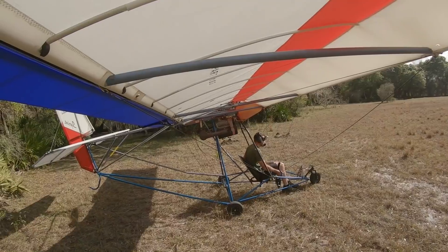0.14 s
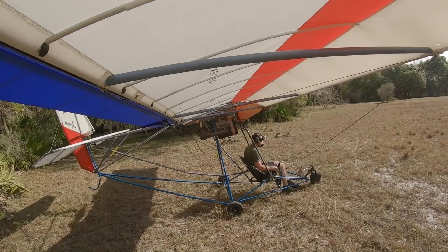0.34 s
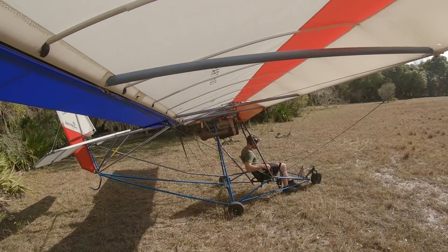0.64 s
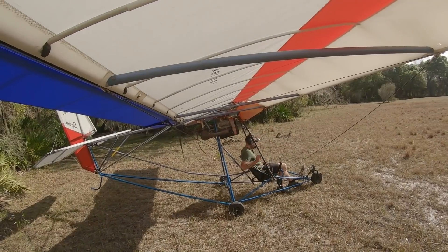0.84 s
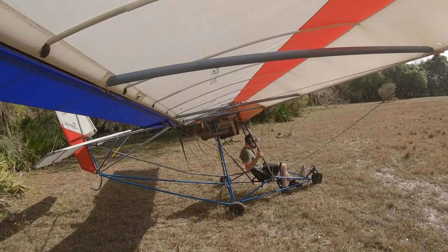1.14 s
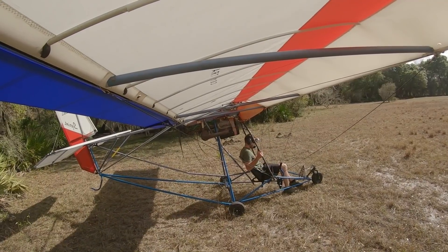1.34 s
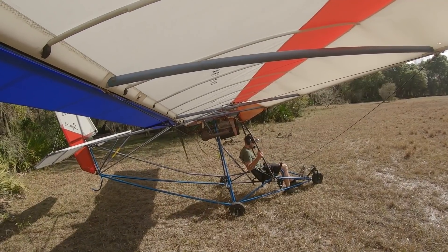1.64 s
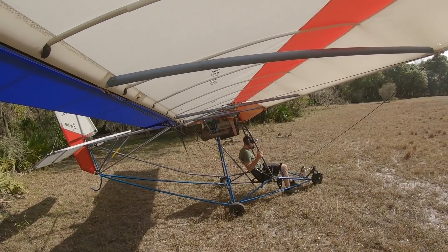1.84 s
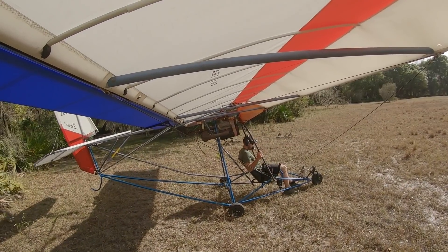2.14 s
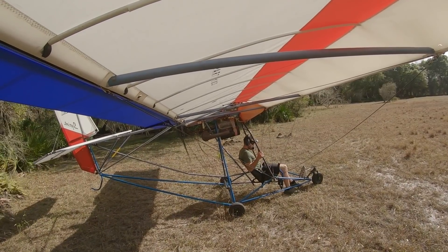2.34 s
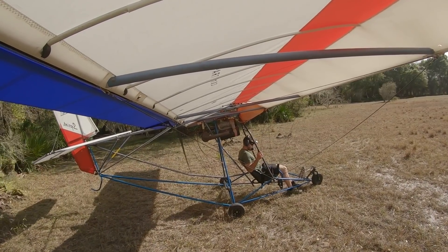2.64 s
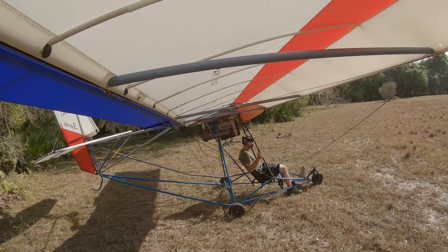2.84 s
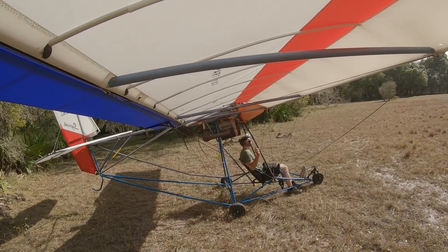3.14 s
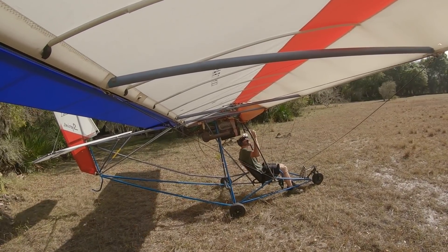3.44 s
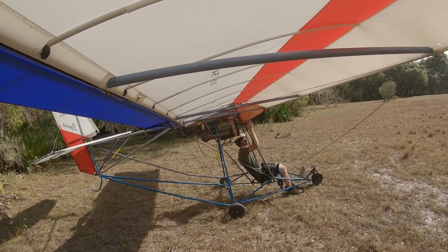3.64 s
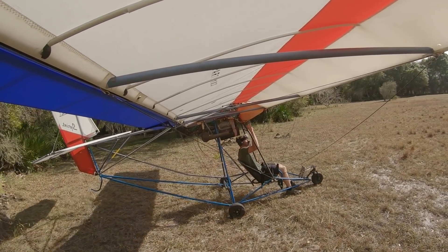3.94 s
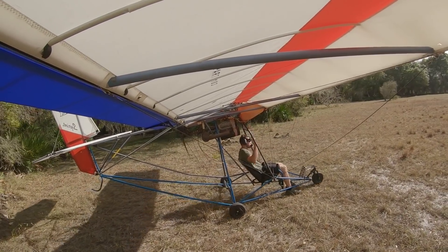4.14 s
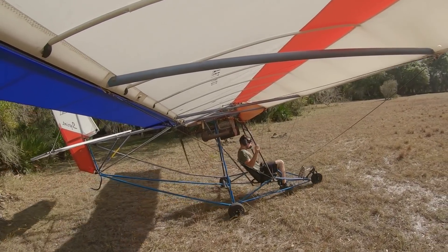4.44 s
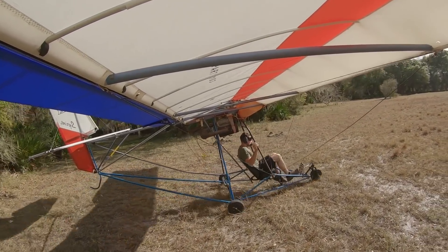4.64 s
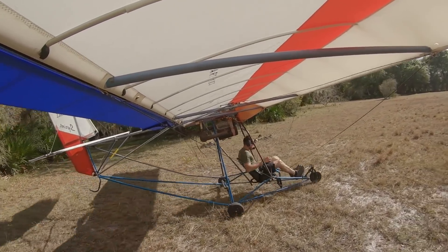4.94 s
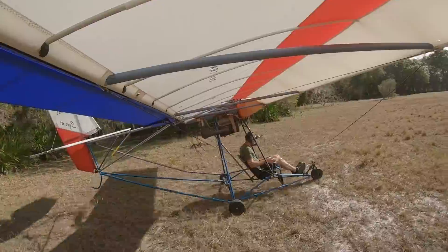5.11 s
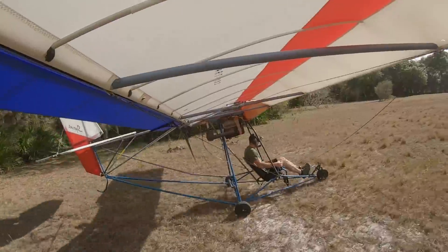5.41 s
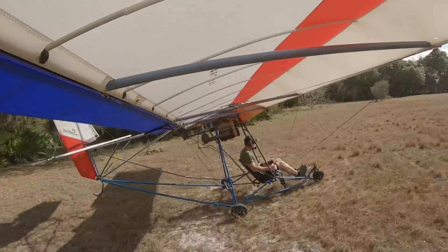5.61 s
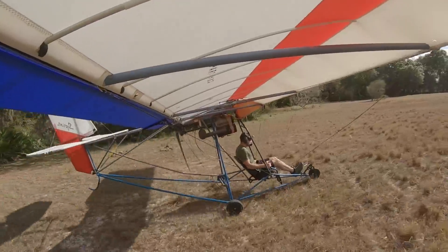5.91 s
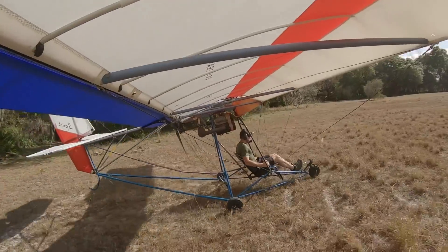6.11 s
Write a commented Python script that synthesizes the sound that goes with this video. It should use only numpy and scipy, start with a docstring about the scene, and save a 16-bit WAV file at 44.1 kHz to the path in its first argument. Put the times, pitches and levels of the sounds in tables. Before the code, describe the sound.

An ultralight in an open grass field, captured from beneath its wing. Quiet moving air gives way to a rough rattling idle, then a rapid climb in pitch to a nasal drone and piercing fan whine. A second, stronger surge brings a thick exhaust boom and fast propeller chop, which holds steady to the end. Close, muffled, nearly centred pickup, with little echo, thin hiss and tiny ticks.

```python
"""Ultralight taking off, heard from under the wing

After a soft rush of air, a twin two-stroke engine idles with knocks and sputters, made from ringing tones.
It runs up: filtered clicks and noise give the rasp, overtones the drone, and a sine the whine of the fan.
At full throttle for the takeoff run, the exhaust booms at the firing rate. The belt-driven pusher propeller
chops the air with a repeated pulse, beating against the engine. Rumble, hiss and faint ticks surround it.
"""
import sys
import numpy as np
from scipy import signal
from scipy.fft import rfft, irfft, next_fast_len
from scipy.io import wavfile
from scipy.ndimage import uniform_filter1d, map_coordinates

SR = 44100
rng = np.random.default_rng(int(sys.argv[2]) if len(sys.argv) > 2 else 0)


def unload_wav(signal):
    """Save mono or channel-first audio to the path in sys.argv[1] as 16-bit WAV at rate SR, clipped to [-1, 1]."""
    wavfile.write(
        sys.argv[1],
        SR,
        np.round(np.clip(np.atleast_2d(signal).T, -1, 1) * 32767).astype(np.int16),
    )


N = 276507

# Speed and belts. Crankshaft speed: (time [s], speed [turns/s])
CRANK_SPEED = [(1.4, 41.1), (1.49, 42.1), (1.7, 51.1), (1.79, 55.1), (1.93, 60.1), (2.1, 65.3),
               (2.27, 69.3), (2.36, 71.1), (2.62, 74.9), (3.01, 78.3), (3.37, 80.1), (4.18, 82.55),
               (4.26, 84.8), (4.52, 99.3), (4.67, 103.7), (4.95, 106.7), (5.47, 107.8), (6.27, 108.1)]
# The propeller belt slips more under load: (crank speed [turns/s], blade passes [per crank turn])
PROPELLER_BELT = [(41, .756), (66, .741), (80.5, .742), (85, .732), (102, .728)]
# The cooling fan's belt also slips: (crank speed [turns/s], vane passes [per crank turn])
FAN_BELT = [(41, 18.05), (58, 17.98), (66, 17.8), (76, 17.78), (79.2, 17.85), (80.5, 17.86), (82.3, 17.78),
            (100, 17.8)]

# Throttle. The idling engine comes in abruptly.
IDLE_S, IDLE_ATTACK_S = 0.664, 0.018
# The first push is louder at once, before the speed follows: (start [s], attack [s], hold [s], release [s])
FIRST_PUSH, FIRST_PUSH_DB = (1.41, 0.17, 0.084, 0.71), 2.5
# Just below full throttle the fan sings out and many layers change level with it:
# (start [s], attack [s], hold [s], release [s])
SINGING = (2.747, 0.18, 1.061, 0.12)
# The throttle opens fully; the noise surges and settles as the aircraft gets rolling.
THROTTLE_S, OPENING_S = 4.213, 0.42
SURGE_S, SURGE_RISE_S = 4.306, 0.32

# Background air. Colours of the rumble, the opening rush and the hiss: (frequency [Hz], gain [dB])
RUMBLE_COLOUR = [(10, -16), (28, -5), (60, -1), (120, -0.5), (200, -18), (600, -70), (2000, -120)]
RUSH_COLOUR = [(100, -8), (180, 3.5), (300, 3), (600, -2), (1150, -0.5), (2000, -7), (3200, -10.5),
               (4200, -73)]
HISS_COLOUR = [(2500, -19), (4500, -16), (8000, -1.5), (12000, -2.5), (13000, 4.5), (14000, -12),
               (14900, 14), (15300, 3.5)]
RUMBLE_DB, RUMBLE_DB_PER_DOUBLING = -62, 6.5
RUSH_DB, RUSH_FADE_S = -51.5, 0.85

# Faint ticks as the takeoff run begins: (time [s], level [dB], centre [Hz])
TICKS = [(4.712, -55, 8950), (4.788, -42.5, 4070), (4.813, -59, 7900), (4.921, -60, 8800),
         (4.949, -46.5, 4400), (5.027, -58, 8060), (5.103, -47, 4080), (5.149, -60.5, 8230),
         (5.174, -55.5, 5950), (5.181, -54.5, 4540)]
TICK_T60_S, TICK_RING_DB, TICK_RING_T60_S = 0.012, -16, 0.1
# A low thud comes with each tick; its level is relative to the tick.
THUD_DB, THUD_HZ, THUD_T60_S = 9.5, 44.8, 0.067

# Loose fittings knock at idle: (time [s], pitch [Hz], level [dB])
CLANKS = [(0.679, 1126, -37), (0.712, 2120, -42), (0.732, 1420, -37.5), (0.749, 2090, -37),
          (0.803, 705, -39), (0.858, 1208, -42.5), (0.918, 1010, -37), (0.931, 805, -36.5),
          (0.99, 930, -32.5), (1.006, 2290, -37), (1.142, 2000, -35), (1.168, 1230, -32),
          (1.268, 1400, -40.5)]
CLANK_ATTACK_S, CLANK_T60_S = 0.004, 0.08
# Sputters at idle: (time [s], low mode [dB], middle mode [dB], high mode [dB])
SPUTTERS = [(0.732, -54, -50.5, -52.5), (0.914, -53.5, -33.5, -53), (0.942, -60.5, -33.5, -51),
            (0.985, -60, -31.5, -54), (0.996, -44, -32, -32.5), (1.046, -34, -37, -34),
            (1.07, -58, -54, -39.5), (1.305, -41.5, -40.5, -53.5)]
# Silencer modes that a sputter rings: (pitch [Hz], time to fall 60 dB [s])
SILENCER_MODES = [(500, .1), (1100, 0.081), (1720, 0.13)]
SPUTTER_ATTACK_S = 0.0056

# Loose parts shaken by uneven firing: (frequency [Hz], width before squaring [Hz], gain [dB])
LOOSE_PARTS = [(248, 130, -4.5), (507, 110, -11), (716, 160, -11.5), (1210, 240, -2.5), (1810, 220, -2.5)]
RATTLE_DB, RATTLE_SCATTER_DB = -50, 5.5
# The silencer burbles at one low resonance: (frequency [Hz], width before squaring [Hz], gain [dB])
BURBLE_MODES = [(175, 49, 0)]
BURBLE_START_S, BURBLE_RISE_S = 0.84, 0.1
BURBLE_IDLE_DB, BURBLE_DB_PER_DOUBLING = -52, -6

# Drone on crank orders 4, 5, 6 and blade order 7:
# (idle level [dB], rise per speed doubling [dB], singing change [dB], full throttle change [dB])
HUM_LEVELS = [(-51, 6.5, 12, -20), (-76, 25, 15, -15.5), (-59.5, 22.5, -8.5, -8), (-69.5, 32, 4, -29.5)]
HUM_START_S, HUM_ATTACK_S = 1.44, 0.1
# How the silencer colours the 4th order as it sweeps: (frequency [Hz], gain [dB])
SILENCER_COLOUR = [(165, -2.5), (188, -1.5), (250, 3.5), (280, -2), (320, -1.5), (400, 1)]

# Mount and fan sound out while the engine pulls up to a new speed:
# (start [s], attack [s], hold [s], release [s], buzz [dB], buzz tilt [dB/octave], fan [dB])
PULLS = [(1.47, 0.17, 0.58, 0.34, -31, 3.5, -35), (4.191, 0.13, 0.31, 0.15, -25, -5, -27.5),
         (4.399, 0.17, 0.42, 0.14, -31.5, 28.5, -36)]
# Resonances of the engine mount: (frequency [Hz], width before squaring [Hz], gain [dB])
MOUNT = [(565, 290, -17.5), (993, 240, -2.5), (1650, 69, -6), (2158, 170, -10)]
# Whine of the fan: (start [s], attack [s], hold [s], release [s])
WHINE = (2.33, 0.22, 1.7, 0.28)
WHINE_DB, WHINE_LIFT_DB, WHINE_SAG_DB_PER_S = -25.5, 13.5, 3.5

# Overtones that stand out of the rasp: (multiple of crank speed [1], relative level [dB])
ENGINE_SNARL_ORDERS = [(8, -4), (10, -0.5), (11, -2.5), (13, -6), (17, -5), (19, -5.5), (20, 6), (22, -0.5),
                       (25, -1), (26, 0.5), (27, 6), (29, -1), (31, -4.5), (34, -0.5)]
# The propeller's overtones: (multiple of blade rate [1], relative level [dB])
BLADE_SNARL_ORDERS = [(9, -7.5), (10, 1.5), (11, -4.5), (12, 3.5), (15, -2.5), (18, -6.5)]
# Their levels: (idle level [dB], rise per speed doubling [dB], singing change [dB],
# full throttle change [dB], surge [dB], settling [s])
ENGINE_SNARL = (-67, 27.5, 6, -27, 5.5, 1)
BLADE_SNARL = (-65.5, 27, -3.5, -23, 20, 0.75)

# Hardest blade slaps, as the propeller bites into still air: (time [s], relative level [dB])
HARD_SLAPS = [(4.681, -8.5), (4.71, -3), (4.734, -0.5), (4.763, -6), (4.785, -3), (4.811, -8.5),
              (4.837, -7.5), (4.914, -10), (4.941, -3), (4.981, -7), (5.019, -6.5), (5.095, -9.5),
              (5.172, -4.5), (5.224, -6.5), (5.287, -7.5), (5.429, -10)]
HARD_SLAP_DB = -4
# Lighter slaps weaken as the aircraft rolls: (start [s], attack [s], hold [s], release [s])
STALL, STALL_DB, ROLLING_DB = (4.55, 0.087, 0.46, 0.3), -28.5, -34
# Wing resonances rung by a slap: (frequency [Hz], width before squaring [Hz], gain [dB])
WING = [(457, 16, 11), (492.4, 12, 7.5), (554, 240, 2.5), (835, 130, 2)]

# Levels of the low, middle and high band of the rasp: (idle level [dB], rise per speed doubling [dB],
# singing change [dB], full throttle change [dB], surge [dB], settling [s])
RASP_LEVELS = [(-56, 28.5, 2, -16.5, 14.5, 0.39), (-53.5, 29, 3, -26, 18.5, 0.64),
               (-49, 26, 6, -18.5, 11, 0.055)]
# Colour of the rasp: (frequency [Hz], gain [dB])
RASP_COLOUR = [(60, -40.5), (190, -18.5), (265, -14.5), (305, -9.5), (420, -4), (520, -1.5), (700, -0.5),
               (1100, -3), (1650, -2.5), (2200, -4), (2400, -8), (2850, -5), (3400, -12), (4200, -69)]
# Churned air against the pulses: same columns as RASP_LEVELS
CHURN = (5, -8.5, 1, -5, 13.5, 1.5)
# Colours of churned air and of blade clicks: (frequency [Hz], gain [dB])
CHURN_COLOUR = [(200, 1.5), (330, -10.0), (600, -9.0), (1100, 3.0)]
BLADE_CLICK_COLOUR = [(400, -2.0), (900, -5.5), (2000, -12.0)]
# The rasp eases before full throttle: (start [s], attack [s], hold [s], release [s])
EASE = (3.267, 0.74, 0.18, 0.26)
EASE_DB = (-5, -8, -3)  # low, middle, high band
# Random wavering of each band: (at idle [dB], one speed doubling above [dB])
WAVER_DB, WAVER_KNOTS_PER_S = (1.5, 0.82), 14

# Firing boom, exhaust overtones and blade chop at full throttle:
# (start [s], rise [s], held level [dB], overshoot [dB], settling [s])
LOAD_VOICES = [(4.14, 0.41, -20.5, -1, 0.46), (4.33, 0.1, -22.5, 6.5, 0.17), (4.27, .37, -21.5, 3, 0.55)]
# Overtones of the exhaust: (multiple of crank speed [1], relative level [dB])
EXHAUST_ORDERS = [(4, 1), (6, 0), (7, -10.5), (8, -11), (10, 5.5), (11, -11.5), (12, -12), (14, -3),
                  (16, -5), (17, -18), (18, -28.5), (19, -28), (20, -9.5), (21, -7.5), (24, -35), (25, -16),
                  (26, -28), (27, -45.5), (28, -12.5), (30, -32), (32, -14)]
# Overtones of the chop: (multiple of blade rate [1], relative level [dB])
BLADE_ORDERS = [(2, -20), (3, -2), (4, -32), (5, -22), (6, 3), (7, -1.5), (8, 0), (9, 2.5), (10, -4.5),
                (11, -23), (12, -14.5), (13, -17.5), (14, -13.5), (15, -13), (16, -15), (17, -26),
                (19, -10.5)]

# How alike left and right are: (frequency [Hz], likeness [0-1])
ALIKE = [(100, 1), (500, 1), (1500, 0.97), (3000, 0.96)]
DULL_HZ, TOP_HZ = 3480, 15350


def amp(db):
    """Turn decibels into gain."""
    return 10 ** (np.asarray(db) / 20)


def unit(x):
    """Scale to rms 1."""
    return x / np.sqrt(np.mean(x ** 2) + 1e-20)


def along(points, hz):
    """Read a table of (frequency, value) points on a log axis."""
    f, v = np.transpose(points)
    return np.interp(np.log(hz + 1), np.log(f + 1), v)


def crank_speed():
    """Crankshaft turns a second, for every sample."""
    s, speed = np.transpose(CRANK_SPEED)
    return np.interp(np.arange(N) / SR, s, speed)


def doublings():
    """Engine speed in octaves above idle."""
    speed = crank_speed()
    return np.log2(speed / speed[0])


def wobble(rate):
    """A smooth random curve with this many knots a second."""
    knots = rng.standard_normal(int(N * rate / SR) + 4)
    return map_coordinates(knots, [np.arange(N) * rate / SR])


def ramp(start_s, rise_s):
    """0 before the start, then straight up to 1."""
    return np.clip((np.arange(N) / SR - start_s) / rise_s, 0, 1)


def envelope(start_s, attack_s, hold_s, release_s):
    """Attack, hold and release, 0-1."""
    return ramp(start_s, attack_s) * (1 - ramp(start_s + attack_s + hold_s, release_s))


def settle(start_s, settle_s):
    """1 until the start, then dying towards 0."""
    return np.exp(-np.maximum(np.arange(N) / SR - start_s, 0) / settle_s)


def effort_db(idle_db, rise_db, singing_db, full_db, surge_db=0, settle_s=1):
    """The level of a layer follows engine speed, the singing of the fan and the throttle."""
    surge = ramp(SURGE_S, SURGE_RISE_S) * settle(SURGE_S + SURGE_RISE_S, settle_s)
    push_db = FIRST_PUSH_DB * envelope(*FIRST_PUSH)
    throttle_db = push_db + full_db * ramp(THROTTLE_S, OPENING_S) + surge_db * surge
    return idle_db + rise_db * doublings() + singing_db * envelope(*SINGING) + throttle_db


def filtered(x, response):
    """Filter a sound by a function of frequency."""
    m = next_fast_len(N + SR // 4)
    return irfft(rfft(x, m) * response(np.fft.rfftfreq(m, 1 / SR)), m)[..., :N]


def below(hz, edge_hz, order):
    """Gain of a low-pass filter."""
    return 1 / np.sqrt(1 + (hz / edge_hz) ** (2 * order))


def resonances(modes, hz):
    """Response of parts that ring; squaring each one makes it steep."""
    return sum(amp(db) * (1j * hz * width / (centre ** 2 - hz ** 2 + 1j * hz * width)) ** 2
               for centre, width, db in modes)


def noise(colour):
    """Coloured noise of rms 1."""
    return unit(filtered(rng.standard_normal(N), lambda hz: amp(along(colour, hz))))


def patchy(x, depth_db, size):
    """The colour shifts at random in patches of frequency and time."""
    z = signal.stft(x, nperseg=512)[2]
    field = uniform_filter1d(rng.standard_normal(z.shape), size=3, axis=0)
    field = uniform_filter1d(field, size=size, axis=1)
    return signal.istft(z * amp(depth_db * unit(field)), nperseg=512)[1][:N]


def turns(speed, drift):
    """Cycles completed by a shaft that never runs quite evenly."""
    return np.cumsum(speed) / SR + drift * wobble(14)


def pulses(phase, second, scatter_db, jitter_s):
    """One click a cycle, uneven in size and time; every second one is scaled by second."""
    at = np.interp(np.arange(1, int(phase[-1])), phase, np.arange(N))
    at = np.clip(at + jitter_s * SR * rng.standard_normal(len(at)), 0, N - 2)
    size = amp(scatter_db * rng.standard_normal(len(at)))
    size = size * np.where(np.arange(len(at)) % 2, second, 1)
    # share each click between the two nearest samples
    i = at.astype(int)
    return unit(np.bincount(i, size * (1 - at + i), N) + np.bincount(i + 1, size * (at - i), N))


def throb(phase, orders, scatter_db, jitter):
    """A sharp suction pulse with the given overtones, repeated at a slightly new size and moment."""
    size = 2048
    multiples, levels = np.transpose(orders)
    multiples = np.round(multiples).astype(int)
    # a phase derived from the smoothed levels packs the overtones into one sharp pulse
    outline = np.interp(np.arange(size // 2 + 1), multiples, levels)
    outline = uniform_filter1d(outline, size=5)
    delay = np.imag(rfft(2 * irfft(np.log(amp(outline)))[:size // 2], size))
    gain = np.zeros(size // 2 + 1)
    gain[multiples] = amp(levels)
    cycle = np.roll(-irfft(gain * np.exp(1j * delay)), size // 2)
    knots = np.arange(int(phase[-1]) + 2)
    strength, late = (np.interp(phase, knots + .5, rng.standard_normal(len(knots))) for _ in range(2))
    repeated = np.interp(phase + jitter * late, np.arange(size) / size, cycle, period=1)
    return unit(amp(scatter_db * strength) * repeated)


def partials(phase, orders, waver_db, stray):
    """Overtones of a shaft, each wavering in strength and phase on its own path through the airframe."""
    out = np.zeros(N)
    for k, db in orders:
        strength = amp(waver_db * wobble(13))
        tone = np.sin(2 * np.pi * round(k) * phase + stray * wobble(17))
        out += amp(db) * unit(strength * tone)
    return out


def rough_ring(t, hz, db, t60_s, attack_s, roughness):
    """A struck part rings and dies away, its phase straying at random."""
    stray = np.cumsum(rng.standard_normal(len(t))) * roughness
    ring = amp(db - 60 * t / t60_s) * np.sin(2 * np.pi * hz * t + stray)
    return ring * (1 - np.exp(-t / attack_s))


def airframe(x, ring_s):
    """Tubes and wing scatter each click into a short dense rattle."""
    t = np.arange(SR // 25) / SR
    scatter = rfft(rng.standard_normal(len(t)) * amp(-60 * t / ring_s))
    evened = irfft(scatter / np.abs(scatter) ** 0.55)  # partly flattens the colour
    return unit(signal.fftconvolve(x, evened)[:N])


def ports(x):
    """The sound reaches the right channel just before the left; a little arrives late and scattered."""
    delayed = np.concatenate([np.zeros(SR // 14), x])[:N]
    scattered = airframe(delayed, ring_s=.03) * np.std(x)
    side = filtered(scattered, lambda hz: np.sqrt((1 - along(ALIKE, hz)) / 2))
    lag_s = 0.00013
    sides = np.array([[-1], [1]])
    return filtered(np.array([x + side, x - side]), lambda hz: np.exp(1j * np.pi * hz * lag_s * sides))


def squash(x):
    """The tallest peaks are rounded off."""
    return x / (1 + np.abs(x / .82) ** 8) ** (1 / 8)


def hiss():
    """Thin coloured noise pulses 60 times a second over steady plain noise."""
    flutter = unit(amp(5 * np.cos(2 * np.pi * 60 * np.arange(N) / SR)))
    return amp(-67.0) * flutter * noise(HISS_COLOUR) + amp(-67.5) * rng.standard_normal((2, N))


def air():
    """Low rumble that grows with the propeller wash, slightly wide, and the soft opening rush."""
    rumble = noise(RUMBLE_COLOUR) + amp(-18.0) * np.array([[1], [-1]]) * noise(RUMBLE_COLOUR)
    rumble_db = RUMBLE_DB + RUMBLE_DB_PER_DOUBLING * doublings()
    rush = amp(RUSH_DB) * (1 - ramp(0, RUSH_FADE_S)) * noise(RUSH_COLOUR)
    return amp(rumble_db) * rumble + ports(rush)


def ticks():
    """Tiny dry ticks of filtered noise, each with its own pitch range, a short ring and a soft thud."""
    out, t = np.zeros(N), np.arange(SR // 5) / SR
    hz = np.fft.rfftfreq(len(t), 1 / SR)
    thud = amp(THUD_DB - 60 * t / THUD_T60_S) * np.sin(2 * np.pi * THUD_HZ * t)
    decay = amp(-60 * t / TICK_T60_S) + amp(TICK_RING_DB - 60 * t / TICK_RING_T60_S)
    for s, db, centre in TICKS:
        burst = rfft(decay * rng.standard_normal(len(t)))
        crack = irfft(burst * resonances([(centre, centre / 2, 6)], hz), len(t))
        out[round(s * SR):][:len(t)] += amp(db) * (crack + thud)
    return out


def clanks():
    """At idle, loose fittings knock now and then, each with one short rough ring."""
    out, t = np.zeros(N), np.arange(SR // 6) / SR
    for s, hz, db in CLANKS:
        ring = rough_ring(t, hz, db, CLANK_T60_S, CLANK_ATTACK_S, roughness=.045)
        out[round(s * SR):][:len(t)] += ring
    return out


def sputters():
    """Single harder firings at idle ring the modes of the silencer, each straying in phase."""
    out, t = np.zeros(N), np.arange(SR // 6) / SR
    for s, *levels in SPUTTERS:
        for (hz, t60_s), db in zip(SILENCER_MODES, levels):
            ring = rough_ring(t, hz, db, t60_s, SPUTTER_ATTACK_S, roughness=.03)
            out[round(s * SR):][:len(t)] += ring
    return out


def rattle(crank):
    """Uneven firing shakes the loose parts and makes the silencer burble, which weakens with speed."""
    knocks = pulses(2 * crank, second=.8, scatter_db=RATTLE_SCATTER_DB, jitter_s=.003)
    shaken = airframe(knocks, ring_s=.07)
    loose = amp(RATTLE_DB) * unit(filtered(shaken, lambda hz: resonances(LOOSE_PARTS, hz)))
    burble = unit(filtered(knocks, lambda hz: resonances(BURBLE_MODES, hz)))
    burble_db = BURBLE_IDLE_DB + BURBLE_DB_PER_DOUBLING * doublings()
    return loose + ramp(BURBLE_START_S, BURBLE_RISE_S) * amp(burble_db) * burble


def hum(crank, blade):
    """At part throttle four low overtones of silencer and propeller drone together."""
    phases = 4 * crank, 5 * crank, 6 * crank, 7 * blade
    # each overtone wanders in phase on its own path
    tones = [unit(np.sin(2 * np.pi * phase + .6 * wobble(9))) for phase in phases]
    fourth_hz = np.gradient(phases[0]) * SR
    tones[0] = tones[0] * amp(along(SILENCER_COLOUR, fourth_hz))
    drone = sum(amp(effort_db(*law) + 2.2 * wobble(14)) * tone for law, tone in zip(HUM_LEVELS, tones))
    return ramp(HUM_START_S, HUM_ATTACK_S) * drone


def buzz(crank):
    """As the engine speeds up, its firing overtones climb fitfully through the resonances of the mount."""
    firing = pulses(2 * crank, second=.65, scatter_db=1.8, jitter_s=.00005)
    firing = patchy(firing, depth_db=1.7, size=8)
    out = np.zeros(N)
    for *shape, db, tilt_db, _ in PULLS:
        tilt = lambda hz: amp(tilt_db * np.log2(np.clip(hz, 500, 2400) / 1000))
        mounted = filtered(firing, lambda hz: resonances(MOUNT, hz) * tilt(hz))
        out += amp(db) * envelope(*shape) * unit(mounted)
    return out


def fan(fan_phase, crank):
    """While the engine pulls up, the fan tone sweeps with it, wavering and shaken by each firing."""
    pulling = sum(amp(db) * envelope(*shape) for *shape, _, _, db in PULLS)
    shaken = 1 + .9 * np.cos(4 * np.pi * crank)
    tone = np.sin(2 * np.pi * fan_phase + .8 * wobble(40))
    return pulling * unit(amp(2.2 * wobble(22)) * shaken * tone)


def whine(fan_phase, blade):
    """The fan sings on one tone with a weak octave, lightly chopped by the propeller."""
    angle = 2 * np.pi * fan_phase + .22 * wobble(60)
    tone = np.sin(angle) + amp(-23) * np.sin(2 * angle)
    chopped = unit(tone * (1 + .15 * np.cos(2 * np.pi * blade)))
    sag_db = WHINE_SAG_DB_PER_S * (np.arange(N) / SR - WHINE[0])
    db = WHINE_DB + WHINE_LIFT_DB * envelope(*SINGING) - sag_db
    return envelope(*WHINE) * amp(db + .7 * wobble(45)) * chopped


def snarl(crank, blade):
    """Under load, single overtones of engine and propeller stand out of the rasp and waver."""
    engine = partials(crank, ENGINE_SNARL_ORDERS, waver_db=3.0, stray=0.62)
    propeller = partials(blade, BLADE_SNARL_ORDERS, waver_db=2.8, stray=0.65)
    return amp(effort_db(*ENGINE_SNARL)) * engine + amp(effort_db(*BLADE_SNARL)) * propeller


def slaps(blade):
    """At full throttle and low ground speed the blades slap the air unevenly and ring the wing."""
    wing = lambda hz: resonances(WING, hz)
    # a light slap comes on every second blade pass
    light = pulses(blade / 2, second=1, scatter_db=2.5, jitter_s=.0012)
    light_gain = amp(STALL_DB) * envelope(*STALL) + amp(ROLLING_DB) * ramp(*STALL[:2])
    hard = np.zeros(N)
    for s, db in HARD_SLAPS:
        hard[round(s * SR)] = amp(db + HARD_SLAP_DB)
    peak = np.abs(filtered(signal.unit_impulse(N), wing)).max()
    return light_gain * unit(filtered(light, wing)) + filtered(hard, wing) / peak


def rasp_source(crank, blade):
    """Firing clatter, blade clicks and churned air that puffs with each blade and firing."""
    # the two cylinders fire half a turn apart, each with a ring of its own
    firing = np.zeros(N)
    for lead in (0, .5):
        clicks = pulses(crank + lead, second=0.97, scatter_db=2.5, jitter_s=.00002)
        firing += airframe(clicks, ring_s=0.028)
    blade_clicks = pulses(blade, second=0.95, scatter_db=2.0, jitter_s=.00006)
    blade_clicks = airframe(blade_clicks, ring_s=0.057)
    blade_clicks = filtered(blade_clicks, lambda hz: amp(along(BLADE_CLICK_COLOUR, hz)))
    puffs = amp(0.73 * np.cos(2 * np.pi * blade) + 0.4 * np.cos(4 * np.pi * crank))
    churn = unit(rng.standard_normal(N) * puffs)
    churn = amp(effort_db(*CHURN)) * filtered(churn, lambda hz: amp(along(CHURN_COLOUR, hz)))
    return patchy(amp(-7) * unit(firing) + blade_clicks + churn, depth_db=1.1, size=10)


def rasp(crank, blade):
    """Clatter and churned air in three bands, each rising with effort and wavering on its own."""
    source = rasp_source(crank, blade)
    low = lambda hz: below(hz, 810, order=6) ** 2
    lower = lambda hz: below(hz, 1304, order=8) ** 2
    bands = low, lambda hz: lower(hz) - low(hz), lambda hz: 1 - lower(hz)
    out = np.zeros(N)
    for band, law, ease_db in zip(bands, RASP_LEVELS, EASE_DB):
        voice = filtered(source, lambda hz: band(hz) * amp(along(RASP_COLOUR, hz)))
        # even out the slow loudness, so that the level set below decides the strength
        power = np.abs(uniform_filter1d(voice ** 2, size=SR // 4))
        steady = voice / np.sqrt(power + 1e-12)
        waver_db = np.interp(doublings(), [0, 1], WAVER_DB) * wobble(WAVER_KNOTS_PER_S)
        out += amp(effort_db(*law) + ease_db * envelope(*EASE) + waver_db) * steady
    return out


def full_throttle(crank, blade):
    """The exhaust booms twice a turn and the loaded blades chop unevenly."""
    boom_gain, exhaust_gain, chop_gain = (
        ramp(s, rise_s) * amp(db + over_db * settle(s + rise_s, settle_s))
        for s, rise_s, db, over_db, settle_s in LOAD_VOICES)
    boom = boom_gain * amp(0.31 * wobble(32)) * unit(-np.cos(4 * np.pi * crank))
    exhaust = exhaust_gain * throb(crank, EXHAUST_ORDERS, scatter_db=1.1, jitter=.003)
    chop = chop_gain * throb(blade, BLADE_ORDERS, scatter_db=1.7, jitter=.004)
    return boom + patchy(exhaust, depth_db=1.8, size=12) + patchy(chop, depth_db=1, size=8)


def scene():
    """The aircraft sounds dull, with only a thin hiss and a few ticks above it."""
    speed = crank_speed()
    crank = turns(speed, drift=.0045)
    blade = turns(speed * along(PROPELLER_BELT, speed), drift=.003)
    fan_phase = turns(speed * along(FAN_BELT, speed), drift=.07)
    aircraft = clanks() + sputters() + rattle(crank)
    aircraft += hum(crank, blade) + buzz(crank)
    aircraft += fan(fan_phase, crank) + whine(fan_phase, blade)
    aircraft += snarl(crank, blade) + slaps(blade)
    aircraft += rasp(crank, blade) + full_throttle(crank, blade)
    aircraft *= ramp(IDLE_S, IDLE_ATTACK_S)
    dull = filtered(squash(ports(aircraft) + air()), lambda hz: below(hz, DULL_HZ, order=60))
    return dull + hiss() + ticks()


def record(dry):
    """Nothing is kept above the top frequency."""
    return filtered(dry, lambda hz: hz < TOP_HZ)


dry = scene()
out = record(dry)
unload_wav(out)
```